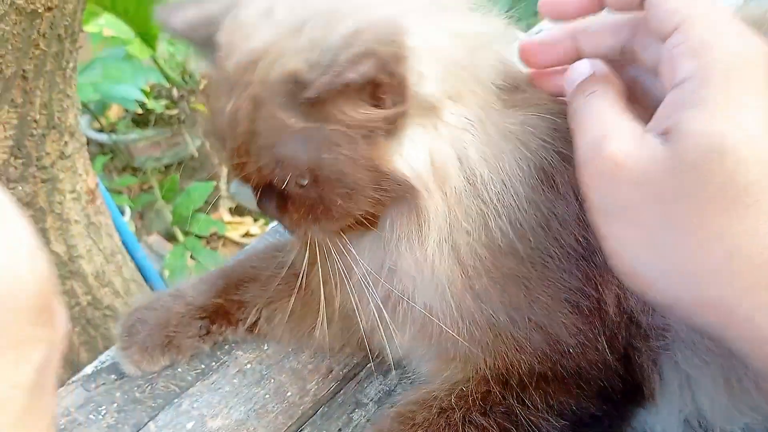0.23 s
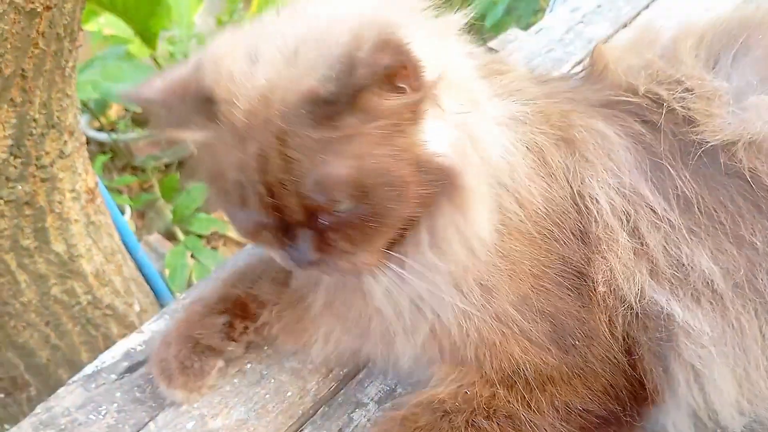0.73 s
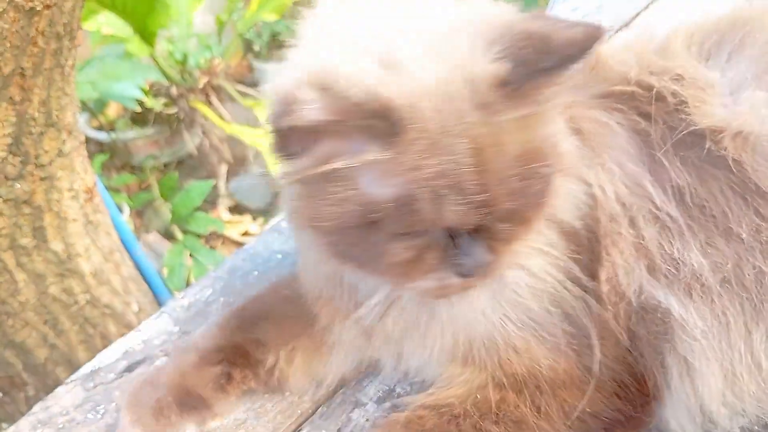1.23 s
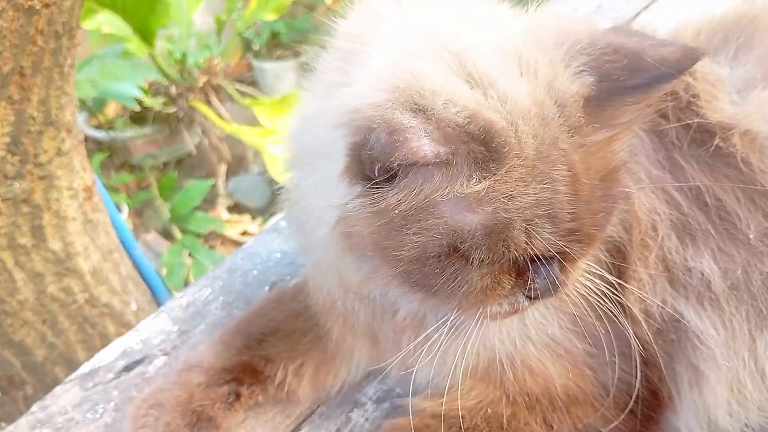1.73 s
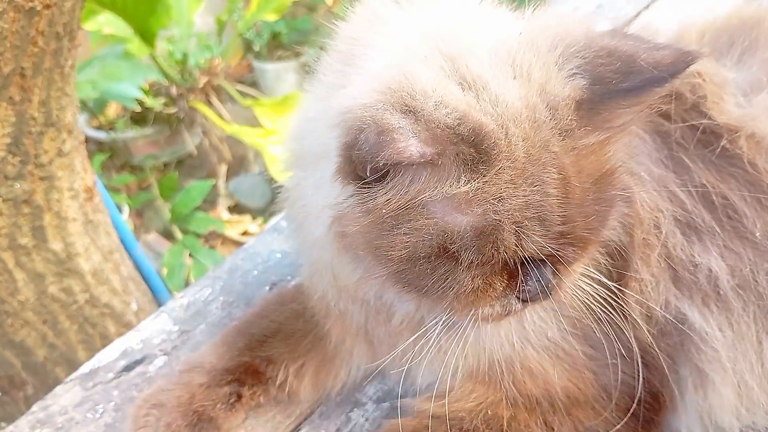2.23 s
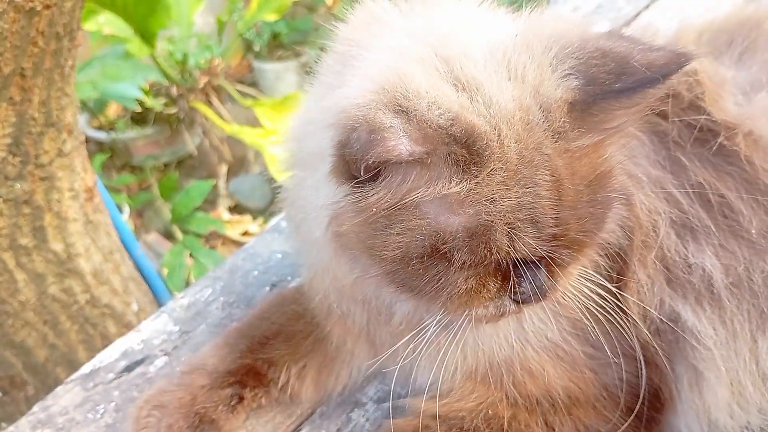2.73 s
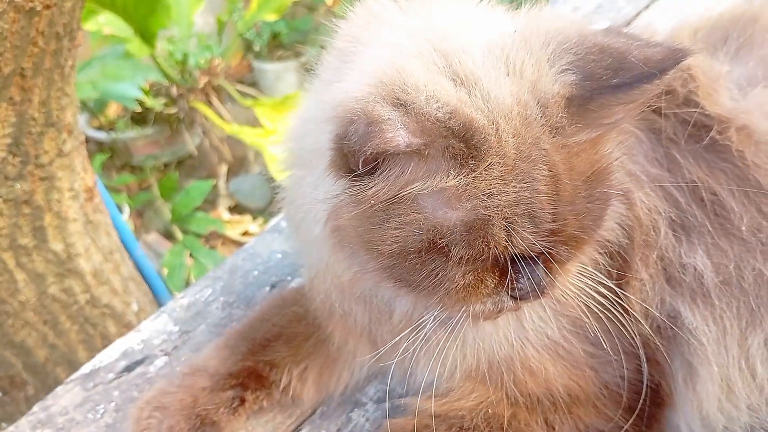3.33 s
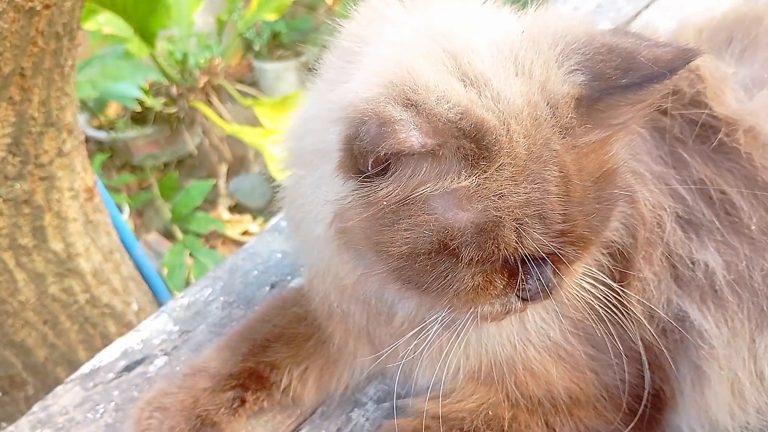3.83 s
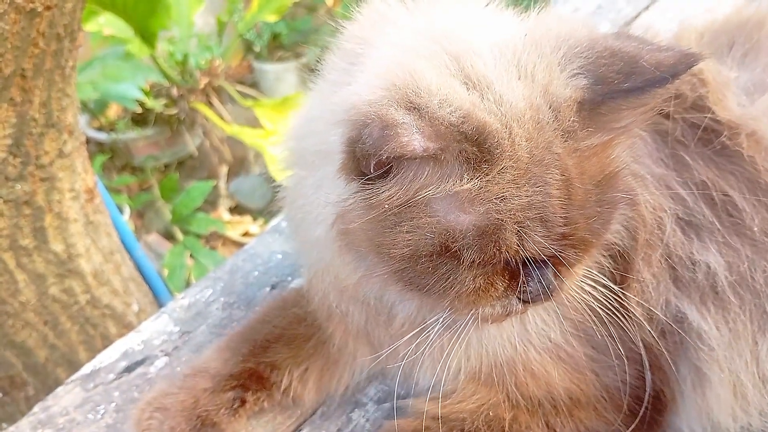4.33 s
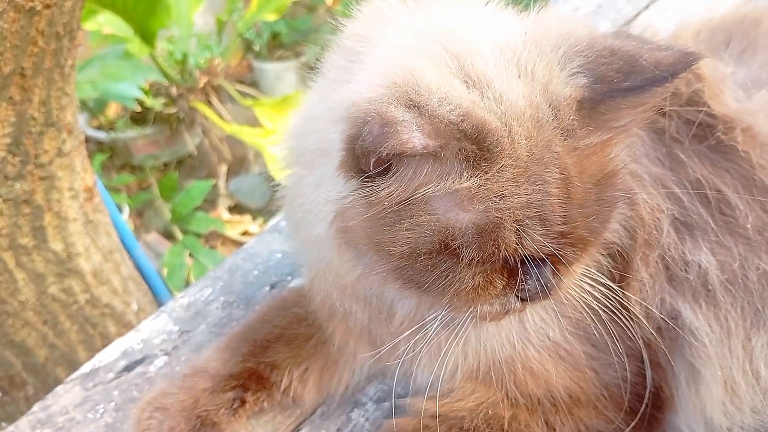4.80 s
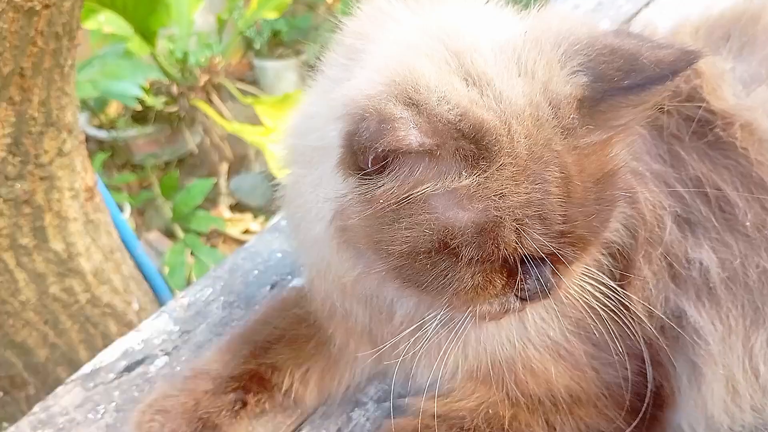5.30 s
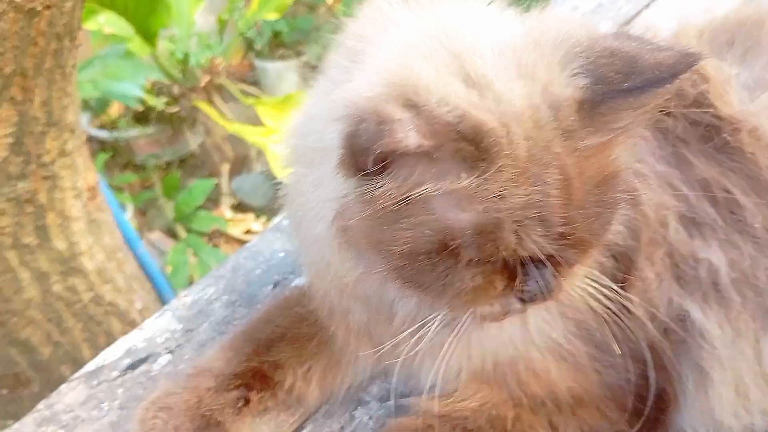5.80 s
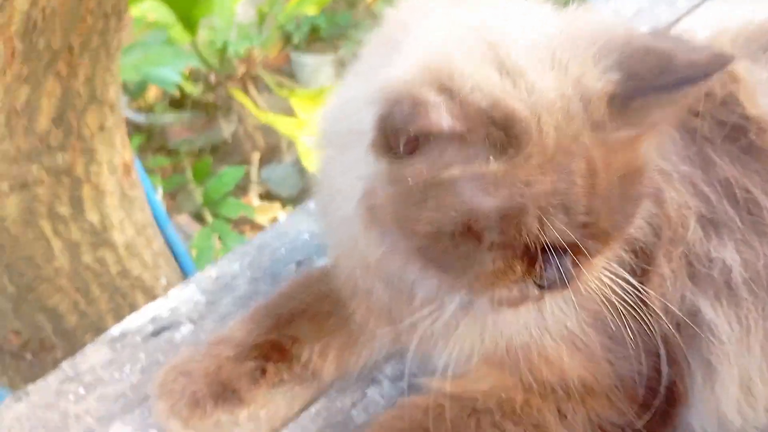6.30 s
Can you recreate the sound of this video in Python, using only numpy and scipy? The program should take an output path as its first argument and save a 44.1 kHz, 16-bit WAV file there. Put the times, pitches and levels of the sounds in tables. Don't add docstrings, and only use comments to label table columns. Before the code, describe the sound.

A garden with soft low traffic and far birds piping on a quick steady beat. From the start a small bird whistles high, then dips and slides down, repeating about every 0.6 seconds. The tail of a dove's coo opens the scene and leaves rustle at 0.4. Around 1 second a tool gives a long low scrape, leaves shuffle and twigs tick, while the dove begins hollow, rolling coos lasting to about 3 seconds. Distant twitter thickens from 2 to 3.5. A dull knock lands at 3.05, during a pause in the small bird's song, which resumes at 3.6. A low motor drones by from 3.4 to 5.4. At 4.8 the tool squeals; the dove answers from 5.2. At 5.7 comes a short sharp scrape with a metallic ping, amid shuffling leaves and final coos. One slightly thin microphone, short garden echoes.

```python
import sys
import numpy as np
from scipy import signal
from scipy.io import wavfile

SR = 44100
rng = np.random.default_rng(int(sys.argv[2]) if len(sys.argv) > 2 else 0)


def pcm_store(signal):
    levels = np.round(np.clip(np.atleast_2d(signal), -1, 1) * 32767)
    wavfile.write(sys.argv[1], SR, levels.astype(np.int16).T)


def voltage_ratio(level):
    return 10 ** (np.asarray(level, float) / 20)


N = 288855

# frequency in Hz, level in dB per Hz.
AIR_SPECTRUM = [(15, -59.5), (25, -16), (72, -2.5), (102, -0.5), (248, -9), (448, -16.5), (636, -17.5),
                (1180, -27), (1680, -26), (2450, -33.5), (3040, -27.5), (3300, -36), (3880, -20.5),
                (4810, -44.5), (15800, -56.5)]
AIR_DB = -40
# time in seconds, level in dB.
TRAFFIC_SWELL = [(0.0, -47.5), (0.31, -39), (1.31, -46.5), (4.1, -42.5), (6.09, -44), (6.55, -40.5)]
# centre in Hz, width in Hz, level in dB.
TRAFFIC_DRONE = [(80.8, 10.3, -45.5), (98.85, 12, -43.5), (171.7, 19.7, -54)]

# time in seconds, level in dB.
MOTOR_PASS = [
    (0, -73),
    (3.4, -54.5),
    (3.7, -46.5),
    (4.2, -47.5),
    (5.0, -48),
    (5.4, -55.5),
    (5.6, -81),
    (6.55, -71.5),
]
# multiple of the firing rate, level in dB.
MOTOR_ORDERS = [(2, -14), (3, -5.5), (4, 4), (6, 0), (7, -0.5), (8, -6.5), (12, -9.5)]
FIRING_HZ = 24.29

# peak in seconds, swell in seconds, dying in seconds, level in dB.
BRUSHES = [(0.425, 0.13, 0.054, -49), (.56, 0.048, 0.11, -68.5), (1.04, 0.028, 0.12, -64.5),
           (1.3, 0.28, 0.15, -69.5), (2.78, 0.16, .11, -61.5), (2.988, 0.041, 0.13, -50),
           (3.898, .1, 0.23, -92), (4.323, 0.018, 0.055, -55), (4.519, 0.017, 0.036, -61),
           (4.86, 0.077, 0.25, -60), (5.77, 0.093, 0.12, -54), (6.4, 0.26, 0.042, -63)]
# frequency in Hz, level in dB per Hz.
BRUSH_SPECTRUM = [(710, -29), (1200, -11.5), (1830, -6), (2100, -15.5), (2660, -5), (5850, -12.5),
                  (9000, -15), (15800, -31)]
BRUSH_FLOOR_DB, BRUSH_EDGE_DB = -71.5, -20
# peak in seconds, swell in seconds, centre in Hz, width in Hz, level in dB.
SHUFFLES = [(0.423, 0.18, 1440, 1520, -55), (1.031, 0.042, 1920, 885, -51.5),
            (1.219, 0.062, 2100, 1030, -40.5), (1.422, 0.1, 1900, 1480, -41), (2.779, 0.43, 935, 1310, -43),
            (5.773, 0.028, 875, 204, -30), (5.765, .02, 1520, 704, -36), (5.8, 0.025, 1710, 603, -36),
            (5.871, 0.037, 1260, 1360, -43.5), (6.293, 0.33, 1490, 597, -45),
            (6.352, 0.015, 1580, 890, -41), (6.41, 0.07, 1450, 780, -37.5)]
SHUFFLE_STOP_S = 0.04

# start in seconds, peak in dB, centre in Hz, 60 dB decay in seconds.
TWIG_TICKS = [(0.8255, -43.5, 8600, 0.035), (0.8694, -50.5, 9200, 0.045), (1.3982, -50, 8600, 0.032),
              (1.4245, -48, 6960, .02), (1.4313, -42.5, 8570, 0.028), (1.4985, -48.5, 8890, 0.055),
              (1.8291, -53, 8600, 0.05), (2.9512, -46, 9130, 0.028), (4.3076, -45, 8600, 0.045),
              (4.5054, -47.5, 8700, 0.038)]
# start in seconds, peak in dB, centre in Hz, 60 dB decay in seconds.
KNOCKS = [
    (3.0505, -31, 1400, .07),
    (3.0525, -39, 950, .06),
    (3.1951, -50, 5800, .3),
    (3.2451, -46, 2000, .03),
    (3.8801, -51, 5500, .4),
    (1.0801, -55, 5400, .35),
]

# start in seconds, attack in seconds, hold in seconds, low and high modes in dB.
SCRAPES = [
    (.96, 0.025, 0.51, -40.5, -60),
    (4.79, 0.054, 0.22, -44.5, -44),
    (5.701, 0.0038, 0.15, -50.5, -51.5),
]
# centre in Hz, width in Hz, level in dB in each of the three strokes.
LOW_MODES = [(2100, 120, -13, -21, -23), (2400, 30, -7.5, -5, -11), (2360, 250, -7, 1.5, -13),
             (2720, 120, -6.5, -6, 0), (2924, 27, -13, -2, 7.5), (3034, 60, -32, -1, 2),
             (3302, 50, -35, -4, 5)]
# centre in Hz, width in Hz, level in dB.
HIGH_MODES = [(6050, 150, 6), (6800, 250, 9), (7800, 400, 14), (8240, 300, 20), (8680, 300, 13),
              (9900, 700, 3), (12200, 260, 7), (15300, 500, 0)]
# start in seconds, peak in dB, centre in Hz, 60 dB decay in seconds.
TOOL_PING = (5.702, -38, 3269, 0.5)
STROKE_RELEASE_DB_PER_S = 116
SQUEAL_FADE_DB = 16

# time in seconds, level in dB.
TWITTER_SWELL = [(0, -66), (.8, -62), (1.5, -56), (2.1, -47.5), (2.7, -46.5), (3.4, -49), (4.2, -51.5),
                 (6.0, -56.5), (6.55, -81)]

# time in seconds, pitch in Hz, level in dB.
PIPER = [(0, 1835, -48), (.6, 1830, -48), (1.1, 1805, -51), (1.6, 1790, -60), (2.1, 1820, -61),
         (2.7, 1700, -66), (2.95, 1580, -54), (3.3, 1570, -54), (3.45, 1645, -52), (3.97, 1640, -52),
         (4.08, 1690, -59), (4.45, 1710, -57), (4.7, 1825, -55), (5.1, 1790, -56), (5.5, 1800, -58),
         (6.55, 1760, -61)]
# time in seconds, pitch in Hz, level in dB.
SECOND_PIPER = [(0, 2064, -55), (.9, 2015, -69.5), (3.0, 2100, -68), (3.4, 2220, -72), (3.9, 2220, -68),
                (4.3, 2150, -63), (4.55, 2120, -68), (4.62, 1990, -66), (5.3, 1998, -65), (6.55, 1968, -66)]
# time in seconds, pitch in Hz, level in dB.
THIN_PIPER = [(0, 3080, -66), (.9, 3070, -66), (1.05, 3060, -57), (1.6, 3080, -62), (2.3, 3100, -59),
              (2.45, 3070, -58), (2.7, 3120, -66), (3.0, 3140, -66), (3.2, 3080, -62), (3.6, 3130, -58),
              (3.8, 3090, -58), (4.1, 3035, -57), (4.2, 3100, -58), (4.4, 3030, -59), (4.8, 3070, -57),
              (5.1, 3030, -61), (5.3, 3050, -60), (6.55, 3040, -66)]
# time in seconds, pitch in Hz, level in dB.
HIGH_PIPER = [(2.0, 5250, -84), (2.8, 5230, -74), (3.4, 5180, -74), (4.4, 5170, -73), (5.2, 5170, -73),
              (5.5, 5170, -84)]
# start in seconds, length in
# seconds, pitch in Hz, fall in Hz, level in dB.
STRAY_TONES = [(0, .033, 1740, 74, -48), (.062, .19, 1620, 60, -52), (.62, .05, 1680, 110, -55),
               (.917, .04, 1750, 200, -51), (4.845, .23, 2405, 0, -48), (5.34, .04, 10100, -450, -69),
               (5.38, .06, 10600, 500, -69), (1.2, .09, 4470, 60, -62), (.9, .08, 3990, 0, -59),
               (4.79, .05, 2390, 0, -55), (5.06, .16, 2415, 10, -60), (4.85, .13, 2290, 40, -53),
               (5.07, .12, 2110, 10, -68), (5.0, .03, 2110, 0, -60), (4.95, .09, 2890, 0, -56),
               (5.07, .08, 2900, 20, -60), (5.247, .089, 1995, 32, -66), (5.538, .036, 1700, -3, -58),
               (.64, .11, 4420, 6, -62), (4.012, .072, 4620, -40, -61), (2.76, .13, 3160, 90, -54),
               (2.88, .09, 3070, -110, -54), (3.57, .04, 1730, 0, -59), (3.62, .12, 2790, 20, -63),
               (4.04, .08, 2700, 0, -62), (.17, .06, 1760, 0, -57)]
FIRST_BEAT_S, BEAT_S, PIPE_S, FLICK_HZ = .075, .1585, .1, 45

# time from onset in seconds, pitch in Hz, level in dB.
WHISTLE = [(-.034, 3300, -18), (-.028, 3450, -7), (-.016, 3750, -7), (-.006, 3950, -14), (.0, 4350, -3),
           (.015, 3850, -6), (.04, 3590, -5), (.085, 3500, 2), (.125, 3490, -14)]
# time from onset in seconds, pitch in Hz, level in dB.
DIP = [(-.008, 2750, -24), (-.001, 3000, -6), (.006, 3130, 0), (.014, 3040, -9), (.024, 2680, -5),
       (.036, 2300, -11), (.046, 2240, -20)]
# time from onset in seconds, pitch in Hz, level in dB.
SLIDE = [(-.012, 3700, -24), (-.004, 4050, -12), (.002, 4200, -5), (.009, 3750, -5), (.016, 3200, -2),
         (.024, 2860, -5), (.04, 2790, -6), (.058, 2780, -24)]
# onset in seconds, peak in dB, pitch ratio,
# length ratio.
WHISTLES_SUNG = [(-0.061, -35.5, 1.005, 0.85),
                 (0.5201, -32, .995, .92), (1.109, -35, 1.0, 0.82), (1.7765, -33.5, .99, 0.66),
            (2.4209, -32, 0.975, 0.95), (3.6447, -34, 1.005, .9), (4.3121, -31.5, 1.01, 0.95),
            (5.1771, -34, 1.005, 0.87), (5.8393, -36.5, 0.985, 1.1)]
# onset in seconds, peak in dB, pitch ratio, length ratio.
DIPS = [(0.1259, -32, 0.985, 0.8), (0.6848, -31.5, 1.0, 1.05), (1.2927, -33, 0.985, 1.0),
        (1.943, -31.5, 0.985, 1.0), (2.6061, -33, 0.965, 1.1), (3.8268, -31, 1.0, 0.85),
        (4.4915, -30.5, 1.0, 0.9), (5.3425, -33, 0.97, 1.0), (6.0262, -30, 0.99, 1.0)]
# onset in seconds, peak in dB, pitch ratio, length ratio.
SLIDES = [(0.1789, -34, 1.02, 0.9), (0.7463, -35.5, 1.05, 0.75), (1.358, -35.5, 1.01, 1.0),
          (1.9962, -34, 0.98, 1.0), (2.668, -34.5, .98, 1.0), (3.8798, -33, 1, 0.88),
          (4.5442, -31, 1.0, 1.0), (5.407, -32, 1.0, 0.95), (6.088, -34, 1.01, 1.03)]

# time in seconds, pitch in Hz, level in dB.
COOS = [
    [(1.085, 659, -40), (1.103, 673, -50), (1.121, 689, -39), (1.141, 700, -43), (1.161, 689, -31),
     (1.217, 652, -43), (1.249, 668, -33), (1.32, 669, -60)],
    [(1.735, 688.2, -33), (1.753, 728, -24.5), (1.807, 732, -33.5), (1.851, 726, -21), (1.921, 692, -25),
     (1.933, 699, -33.5), (1.943, 674.6, -29.5), (2.0, 670, -28.5)],
    [(2.045, 683, -28), (2.057, 657.6, -26.5), (2.105, 681, -33), (2.133, 659, -32), (2.163, 637, -39.5),
     (2.187, 646, -26.5), (2.2, 640, -36)],
    [(2.205, 704.9, -39.5), (2.225, 708, -25.5), (2.275, 736, -25.5), (2.311, 677, -36.5),
     (2.333, 723, -26.5), (2.369, 681, -31), (2.401, 669, -35.5), (2.415, 660, -26)],
    [(5.25, 642.6, -64), (5.258, 626, -42.5), (5.328, 682, -41), (5.35, 670, -54)],
    [(5.425, 722.5, -35.5), (5.449, 720, -23), (5.511, 737, -27.5), (5.545, 723.5, -21.5),
     (5.571, 719.4, -19), (5.631, 691.5, -37.5), (5.643, 686, -33.5), (5.67, 657, -27)],
    [(5.905, 718.2, -49), (5.923, 724.5, -27.5), (5.989, 719, -23.5), (6.009, 734, -32),
     (6.027, 717, -20.5), (6.061, 678, -40), (6.065, 695, -39), (6.125, 655.5, -26)],
    [(6.135, 641, -24.5), (6.15, 632, -23.5), (6.175, 651, -48), (6.2, 645, -25.5), (6.225, 670, -58),
     (6.25, 648, -35), (6.275, 624, -50)],
    [(0, 642, -36.5), (.03, 618, -38), (.07, 611, -42), (.085, 609, -52), (.105, 594, -34),
     (.14, 574, -48.5), (.2, 570, -48)],
    [(5.18, 640, -46.5), (5.195, 668, -39), (5.225, 696, -40), (5.245, 680, -46)],
    [(1.03, 643, -62), (1.045, 690, -40.5), (1.07, 702, -42), (1.085, 666, -45)],
]
COO_HOARSENESS = .1
# start in seconds, length in seconds, first and last pitch in Hz, level in dB.
PURRS = [(-.014, 0.2, 621.5, 577.5, -35.5), (1.033, 0.061, 590, 705, -36.5), (1.465, 0.035, 631, 670, -22),
         (1.5, 0.095, 516, 514, -37.5), (1.534, 0.08, 598, 640, -29.5), (1.615, 0.081, 657, 607, -31),
         (1.681, 0.18, 614, 640, -25.5), (1.971, 0.054, 621, 608.5, -21.5), (2.209, 0.179, 633, 568, -27),
         (2.421, 0.087, 632, 654, -25), (2.433, 0.17, 557, 469, -31), (2.826, 0.051, 533, 612, -24.5),
         (2.86, 0.14, 666, 648, -26.5), (2.58, 0.07, 758, 743, -34.5), (2.866, 0.083, 587, 544, -33),
         (5.176, 0.056, 624, 653, -25), (5.396, 0.15, 604, 610, -30), (5.663, 0.1415, 631, 683.4, -22.5),
         (5.666, 0.09, 566.6, 608, -29), (5.955, 0.2, 609, 584.4, -28), (6.1, 0.096, 725, 685, -31),
         (6.11, 0.065, 566, 552, -32), (6.17, 0.12, 518.6, 465, -33), (6.508, 0.11, 548, 588, -31),
         (5.91, 0.055, 642, 604, -30.5), (6.3, 0.12, 647, 728, -41), (2.53, 0.056, 662, 653, -34)]
PURR_ATTACK_S, PURR_RELEASE_S, PURR_FADE_DB_PER_S = 0.013, 0.019, 54.5
THROBS_PER_S = 28.8

# delay in seconds, level in dB.
WALL_ECHOES = [(.009, -3), (.017, -3), (.026, -7), (.035, -3), (.048, -8), (.071, -12)]


def rms_one(x):
    return x / np.sqrt(np.mean(x ** 2) + 1e-20)


def in_time(rows, edge_s=0.0075):
    times_s, *columns = np.transpose(rows)
    t = np.arange(N) / SR
    gate = np.clip(np.minimum(t - times_s[0], times_s[-1] - t) / edge_s + 1, 0, 1)
    return [np.interp(t, times_s, column) for column in columns] + [gate]


def since(start_s, length_s):
    first = max(round(start_s * SR), 0)
    last = min(round((start_s + length_s) * SR), N)
    at = np.arange(first, last)
    return at, np.abs(at / SR - start_s)


def edges_of(after_s, length_s, attack_s, release_s):
    return np.clip(np.minimum(after_s / attack_s, (length_s - after_s) / release_s), 0, 1)


def drift(rate_hz):
    r = np.exp(-80 * np.pi * rate_hz / SR)
    white = rng.standard_normal(N // 40 + 2002)
    slow = signal.lfilter([1], [1, -2 * r, r * r], white)[2000:]
    return np.interp(np.arange(N) / 40, np.arange(len(slow)), rms_one(slow))


def sine(hz):
    return np.sqrt(2) * np.sin(2 * np.pi * np.cumsum(hz) / SR)


def resonate(x, hz, width_hz):
    r = np.exp(-np.pi * width_hz / SR)
    section = [1, 0, -1, 1, -2 * r * np.cos(2 * np.pi * hz / SR), r * r]
    return rms_one(signal.sosfilt([section, section], x))


def coloured(spectrum, patchy_db, grit=1):
    hz, level_db = np.transpose(spectrum)
    edges_hz = np.geomspace(hz[0], hz[-1], int(2.5 * np.log2(hz[-1] / hz[0])) + 2)
    white = rng.standard_normal((2, N)) * grit
    out = np.zeros(N)
    for k, (low, high) in enumerate(zip(edges_hz, edges_hz[1:])):
        sos = signal.butter(2, [low, high], "band", fs=SR, output="sos")
        band = signal.sosfilt(sos, white[k % 2])
        band_db = np.interp(np.log(low * high) / 2, np.log(hz), level_db)
        out += band * voltage_ratio(band_db + patchy_db * drift(7.1))
    return rms_one(out)


def garden(x, echo_db, tail_db, t60_s, direct_db=0):
    t = np.arange(int(.6 * SR)) / SR
    reply = rng.standard_normal(len(t)) * voltage_ratio(-60 * t / t60_s) * np.clip(t / 0.013, 0, 1)
    reply *= voltage_ratio(tail_db) / np.sqrt(np.sum(reply ** 2))
    for delay_s, level_db in WALL_ECHOES:
        reply[round(delay_s * SR)] += voltage_ratio(level_db + echo_db)
    return voltage_ratio(direct_db) * x + signal.fftconvolve(x, reply)[:N]


def air():
    swell_db, _ = in_time(TRAFFIC_SWELL)
    floor = voltage_ratio(AIR_DB + 1.0) * coloured(AIR_SPECTRUM, patchy_db=3.0)
    low = signal.sosfilt(signal.butter(1, 500, fs=SR, output="sos"), floor)
    white = rng.standard_normal(N)
    drone = sum(voltage_ratio(db) * resonate(white, hz, width_hz) for hz, width_hz, db in TRAFFIC_DRONE)
    return floor + low * (voltage_ratio(swell_db + 40.5) - 1) + drone


def motor():
    level_db, _ = in_time(MOTOR_PASS)
    out = np.zeros(N)
    for order, order_db in MOTOR_ORDERS:
        gain = voltage_ratio(order_db + 2.8 * drift(1.8))
        out += gain * sine(order * FIRING_HZ + 0.93 * drift(2.6))
    return voltage_ratio(level_db) * out


def leaves():
    brush = np.full(N, voltage_ratio(BRUSH_FLOOR_DB))
    for peak_s, swell_s, dying_s, peak_db in BRUSHES:
        at, after_s = since(peak_s - swell_s, swell_s + dying_s)
        corners_s = [0, swell_s, swell_s + dying_s]
        brush[at] += voltage_ratio(peak_db + np.interp(after_s, corners_s, [BRUSH_EDGE_DB, 0, BRUSH_EDGE_DB]))
    grit = voltage_ratio(3 * rng.standard_normal(N) + 1.5 * drift(70))
    out = voltage_ratio(9) * brush * coloured(BRUSH_SPECTRUM, 1.2, grit)
    for peak_s, swell_s, hz, width_hz, peak_db in SHUFFLES:
        at, after_s = since(peak_s - swell_s, swell_s + SHUFFLE_STOP_S)
        swell_db = np.interp(after_s, [0, swell_s, swell_s + SHUFFLE_STOP_S], [-13, 0, -11])
        friction = rng.standard_normal(len(at)) * grit[at]
        out[at] += resonate(friction, hz, width_hz) * voltage_ratio(peak_db + swell_db)
    return out


def ticks(events, breadth):
    out = np.zeros(N + SR)
    t = np.arange(SR // 2) / SR
    for start_s, peak_db, hz, t60_s in events:
        burst = resonate(rng.standard_normal(len(t)), hz, hz * breadth)
        at = round(start_s * SR)
        out[at:at + len(t)] += burst * voltage_ratio(peak_db - 1.5 - 60 * t / t60_s)
    return out[:N]


def scraped_tool():
    contact = rng.standard_normal(N) * voltage_ratio(3.2 * drift(22))
    rings = [resonate(contact, hz, width_hz) for hz, width_hz, *_ in LOW_MODES]
    high = rms_one(sum(voltage_ratio(db) * resonate(contact, hz, width_hz) for hz, width_hz, db in HIGH_MODES))
    out = ticks([TOOL_PING], breadth=0.025)
    for k, (start_s, attack_s, hold_s, low_db, high_db) in enumerate(SCRAPES):
        at, after_s = since(start_s, 2 * hold_s)
        release = voltage_ratio(-STROKE_RELEASE_DB_PER_S * np.maximum(after_s - hold_s, 0))
        stroke = np.minimum(after_s / attack_s, 1) ** 2 * release
        low = sum(voltage_ratio(mode[2 + k]) * ring[at] for mode, ring in zip(LOW_MODES, rings))
        squeal = edges_of(after_s, 2 * hold_s, attack_s, hold_s)
        squeal = squeal * voltage_ratio(high_db - SQUEAL_FADE_DB * after_s / hold_s)
        out[at] += stroke * voltage_ratio(low_db - 4.5) * low + squeal * high[at]
    return out


def twitter():
    level_db, _ = in_time(TWITTER_SWELL)
    out = np.zeros(N + SR)
    for at in np.flatnonzero(rng.random(N) < 220 / SR):
        pitch, length, size = rng.random(3)
        count = int(SR * (0.02 + 0.1003 * length ** 2))
        hz = (3600 + 1050 * pitch) * np.linspace(1.015, .985, count)
        out[at:at + count] += sine(hz) * np.hanning(count) * voltage_ratio(5 * size)
    blurred = out[:N] * (1 + 0.57 * drift(89))
    return voltage_ratio(level_db - 5) * rms_one(garden(blurred, echo_db=-9, tail_db=6, t60_s=0.29))


def pipers():
    after_s = (np.arange(N) / SR - FIRST_BEAT_S) % BEAT_S
    beat = .12 + edges_of(after_s, PIPE_S, .03, .03)
    out = np.zeros(N)
    for line in (THIN_PIPER, HIGH_PIPER):
        hz, level_db, gate = in_time(line)
        tone = sine(hz * (1 + .004 * drift(8)))
        out += gate * (.5 * beat + .5) * tone * voltage_ratio(level_db - 1 + 2 * drift(12))
    hz, level_db, _ = in_time(PIPER)
    arch_hz = FLICK_HZ * (2 * np.minimum(after_s / PIPE_S, 1) - .8) ** 2
    out += beat * voltage_ratio(level_db + 2.0 * drift(9) - 2) * sine(hz - arch_hz + 14 * drift(12))
    hz, level_db, _ = in_time(SECOND_PIPER)
    out += beat * voltage_ratio(level_db + 2.0 * drift(4.5)) * sine(hz + 15 * drift(4.6))
    for start_s, length_s, hz, fall_hz, level_db in STRAY_TONES:
        at, count = round(start_s * SR), round(length_s * SR)
        tone = sine(hz - fall_hz * np.linspace(0, 1, count) ** 2)
        out[at:at + count] += tone * signal.windows.tukey(count, .4) * voltage_ratio(level_db + 2.5)
    return garden(out * voltage_ratio(1.6 * drift(30)), echo_db=-10, tail_db=-7, t60_s=.35)


def small_bird():
    out = np.zeros(N)
    song = ((WHISTLE, WHISTLES_SUNG), (DIP, DIPS), (SLIDE, SLIDES))
    for shape, sung in song:
        after_s, shape_hz, shape_db = np.transpose(shape)
        for onset_s, peak_db, ratio, stretch in sung:
            times_s = onset_s + after_s * stretch
            at = np.arange(max(round(times_s[0] * SR), 0), round(times_s[-1] * SR))
            hz = np.interp(at / SR, times_s, shape_hz) * ratio
            level_db = np.interp(at / SR, times_s, shape_db) + peak_db - 5.5
            out[at] += sine(hz) * voltage_ratio(level_db)
    grainy = out * (.95 + .4 * drift(90))
    return garden(grainy, echo_db=-3.5, tail_db=-2, t60_s=.26, direct_db=-1)


def clear_coos():
    out = np.zeros(N)
    waver = 1 + .002 * drift(14)
    hoarse = 1 + COO_HOARSENESS * drift(30)
    for note in COOS:
        hz, level_db, gate = in_time(note)
        out += gate * voltage_ratio(level_db - 0.5) * sine(hz * waver) * hoarse
    return garden(out, echo_db=-16, tail_db=-13, t60_s=.35)


def purred_coos():
    out = np.zeros(N)
    uneven, rough, wobble = .3 * drift(12), .35 * drift(47), 1 + .035 * drift(25)
    for start_s, length_s, first_hz, last_hz, level_db in PURRS:
        at, after_s = since(start_s, length_s)
        fading = edges_of(after_s, length_s, PURR_ATTACK_S, PURR_RELEASE_S)
        fading = fading * voltage_ratio(level_db - PURR_FADE_DB_PER_S * after_s)
        roll = .65 - .3 * np.cos(2 * np.pi * (THROBS_PER_S * after_s + uneven[at])) + rough[at]
        hz = first_hz + (last_hz - first_hz) * after_s / length_s
        out[at] += fading * sine(hz * wobble[at]) * roll
    return voltage_ratio(-3) * garden(out, echo_db=-8, tail_db=-2, t60_s=.38, direct_db=-2)


def dove():
    return clear_coos() + purred_coos()


def scene():
    background = air() + motor()
    small = leaves() + ticks(TWIG_TICKS, breadth=.7) + ticks(KNOCKS, breadth=.22) + scraped_tool()
    birds = twitter() + pipers() + small_bird() + dove()
    return (background + small + birds)[None]


def roll_off(x):
    return signal.sosfilt(signal.butter(12, 15910, fs=SR, output="sos"), x)


def record(dry):
    thin = signal.sosfilt(signal.butter(2, 70, "high", fs=SR, output="sos"), dry)
    return roll_off(thin)


dry = scene()
out = record(dry)
pcm_store(out)
```